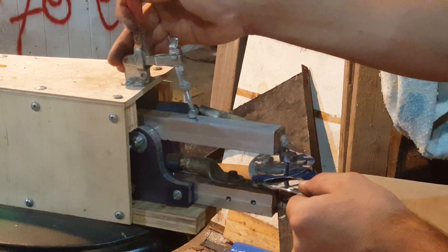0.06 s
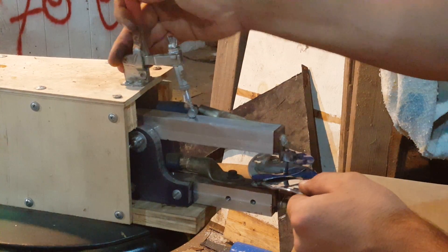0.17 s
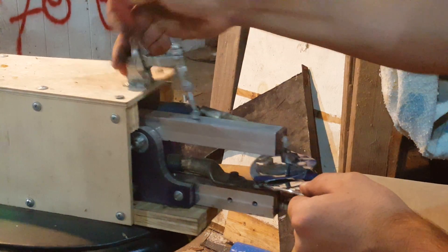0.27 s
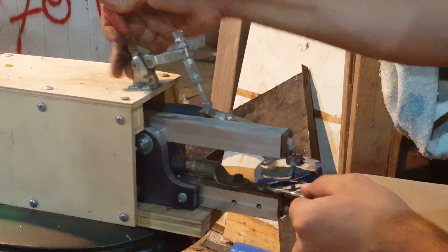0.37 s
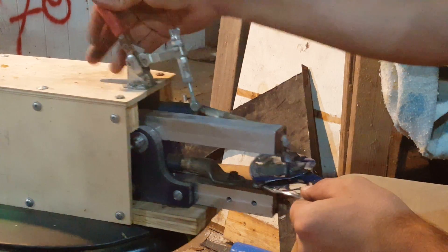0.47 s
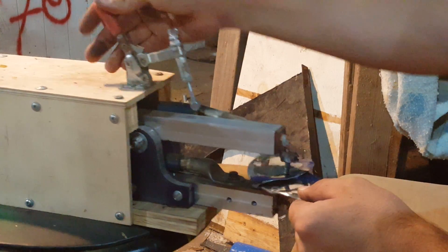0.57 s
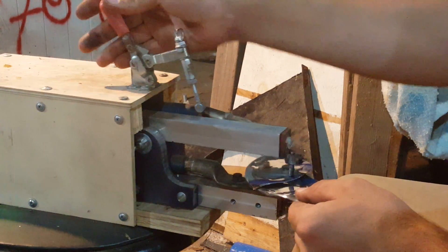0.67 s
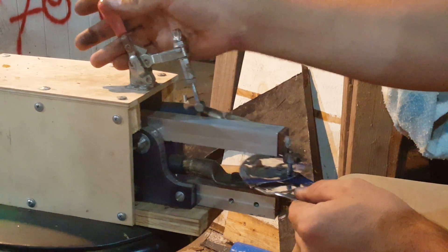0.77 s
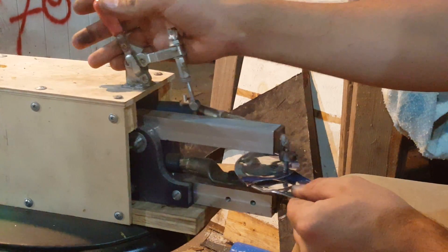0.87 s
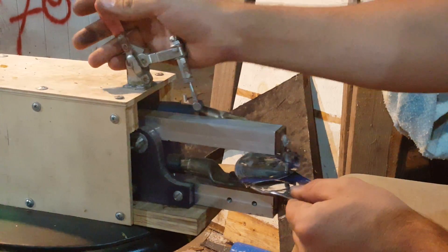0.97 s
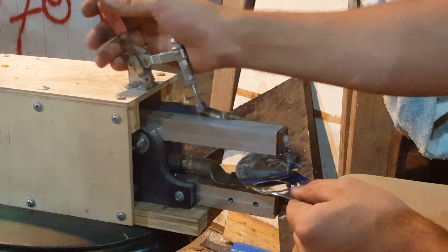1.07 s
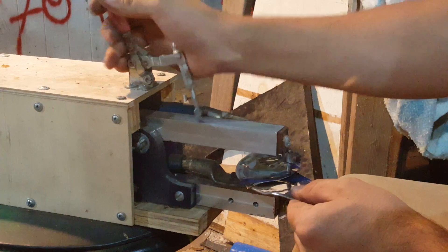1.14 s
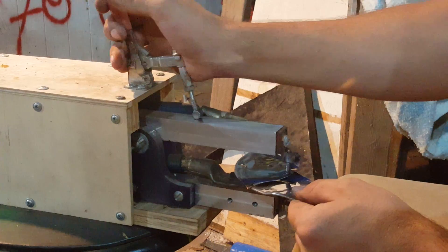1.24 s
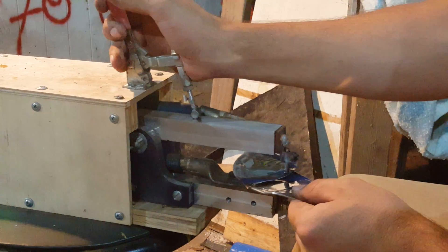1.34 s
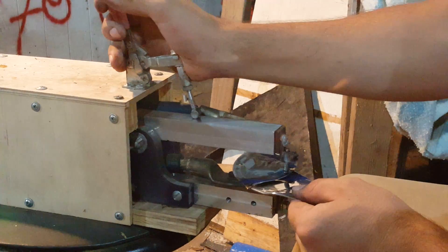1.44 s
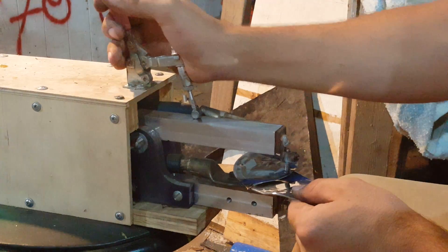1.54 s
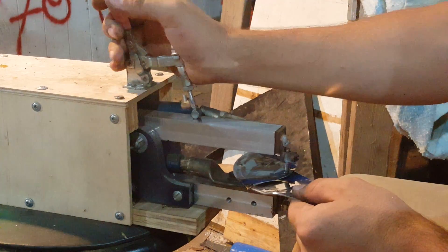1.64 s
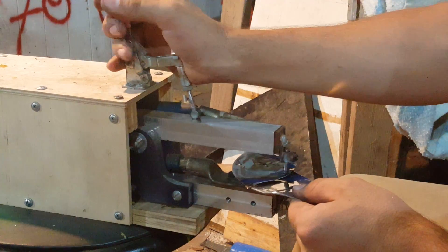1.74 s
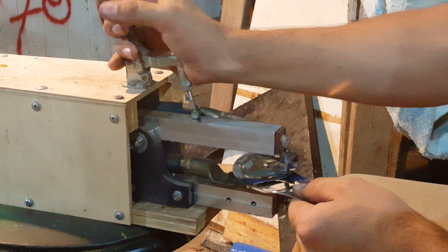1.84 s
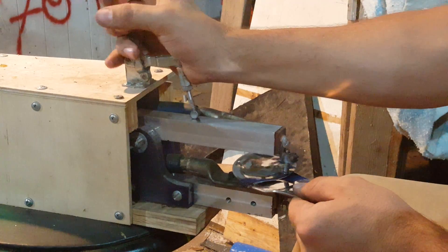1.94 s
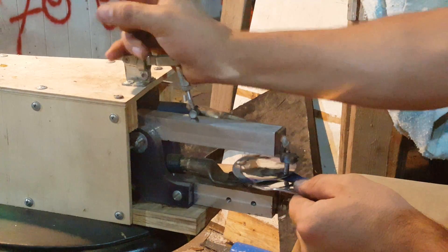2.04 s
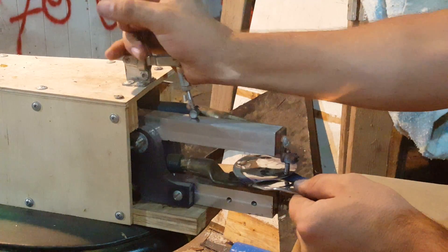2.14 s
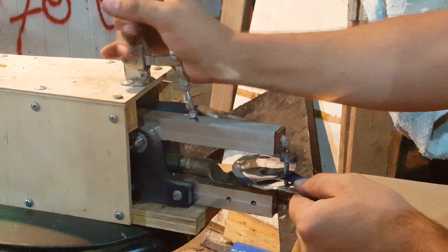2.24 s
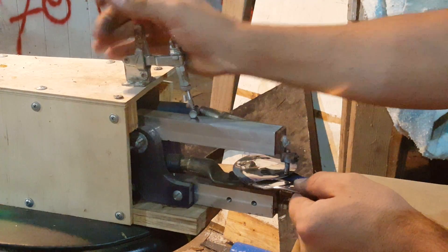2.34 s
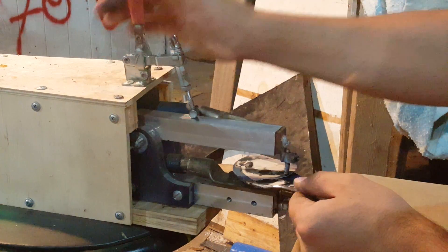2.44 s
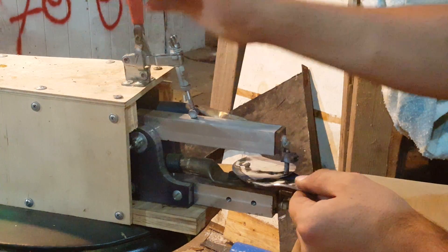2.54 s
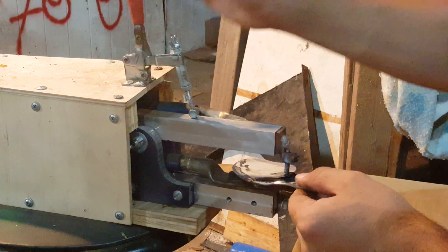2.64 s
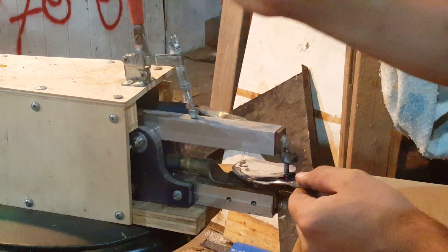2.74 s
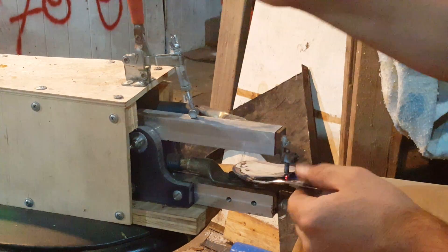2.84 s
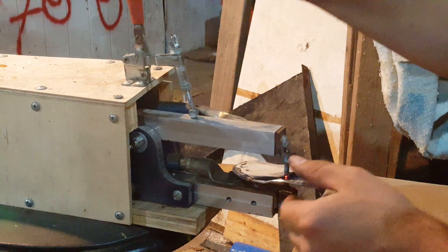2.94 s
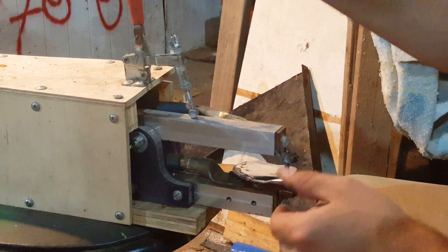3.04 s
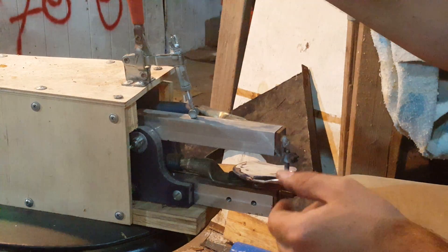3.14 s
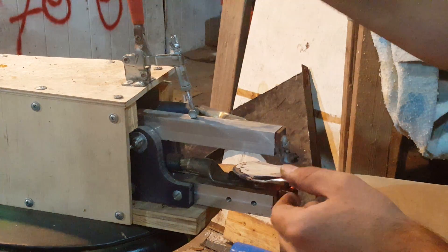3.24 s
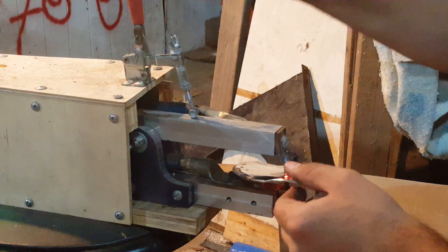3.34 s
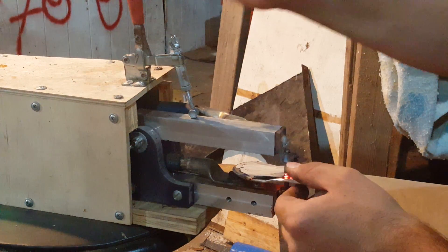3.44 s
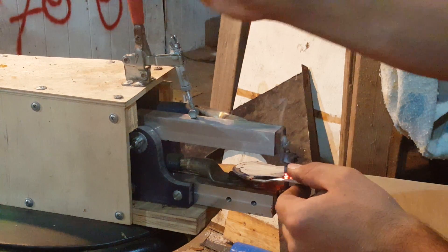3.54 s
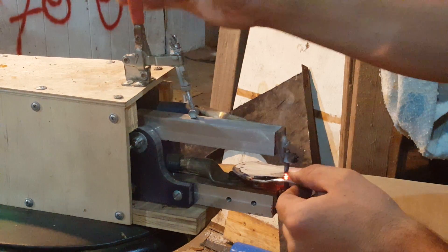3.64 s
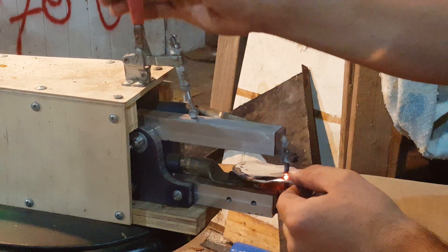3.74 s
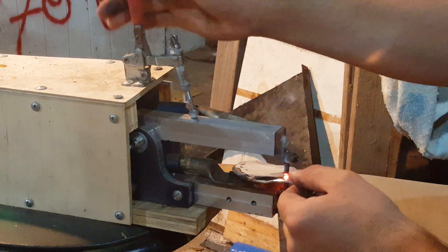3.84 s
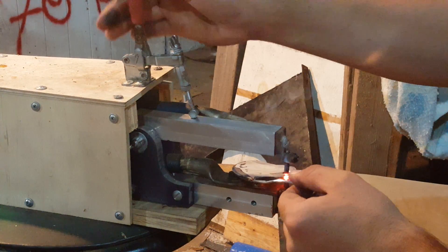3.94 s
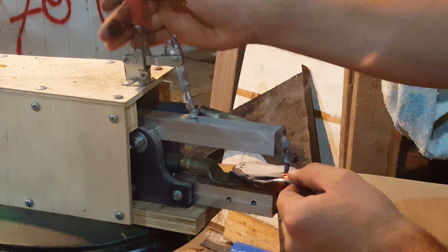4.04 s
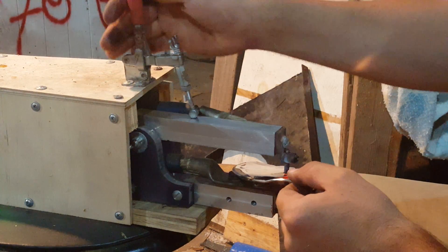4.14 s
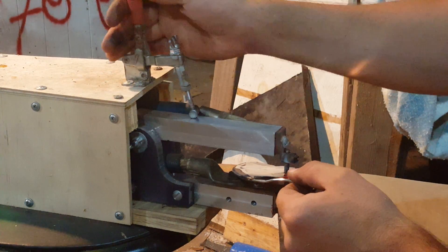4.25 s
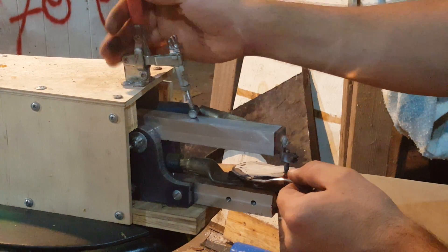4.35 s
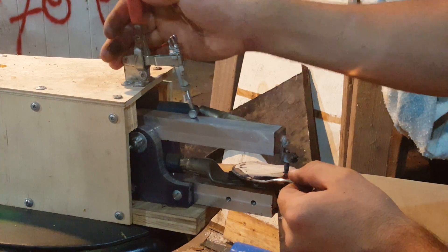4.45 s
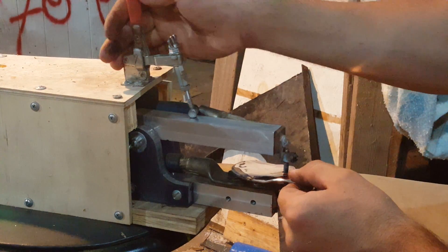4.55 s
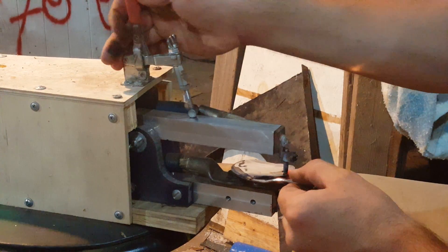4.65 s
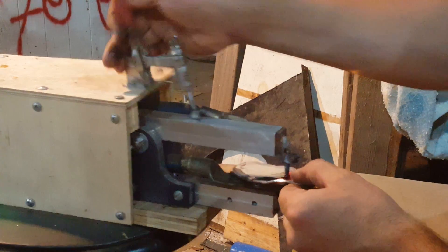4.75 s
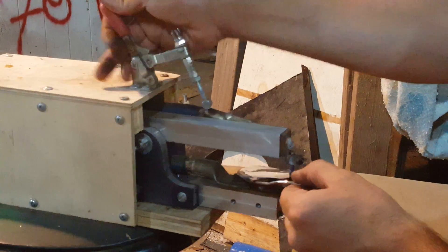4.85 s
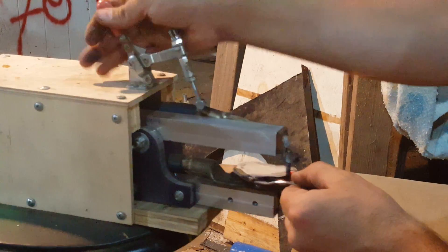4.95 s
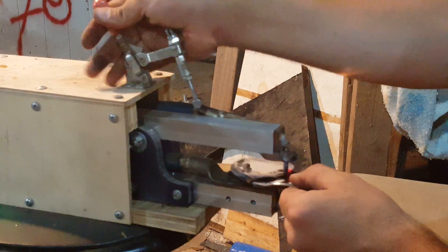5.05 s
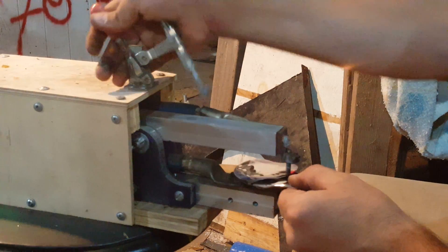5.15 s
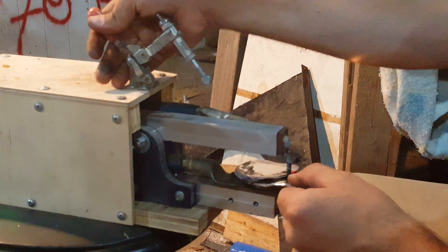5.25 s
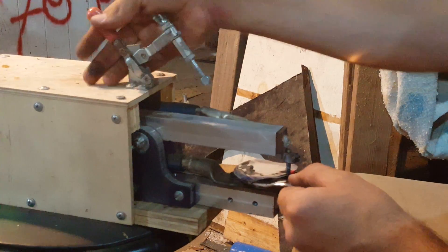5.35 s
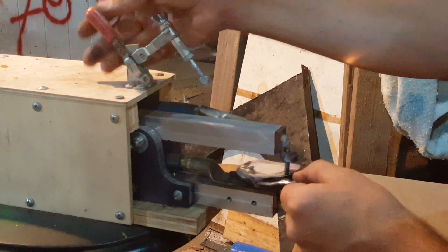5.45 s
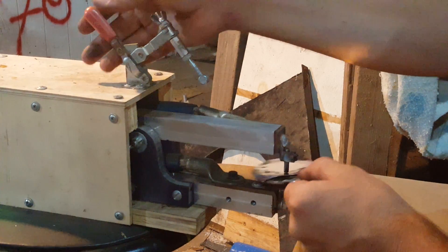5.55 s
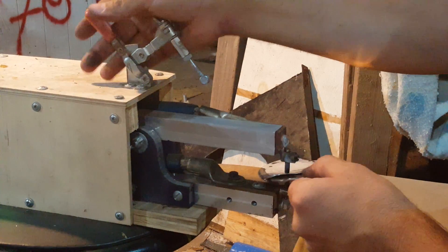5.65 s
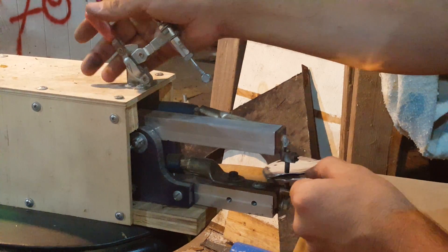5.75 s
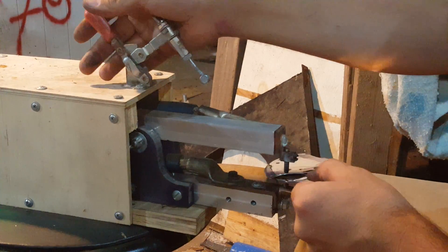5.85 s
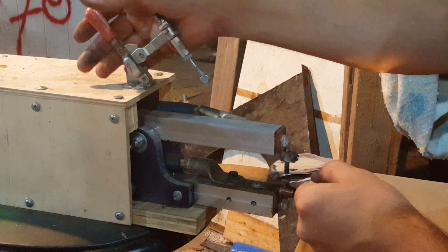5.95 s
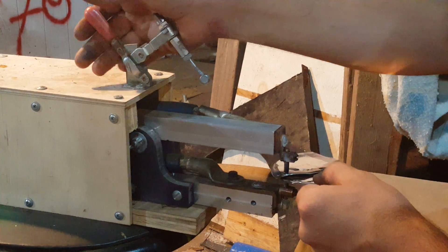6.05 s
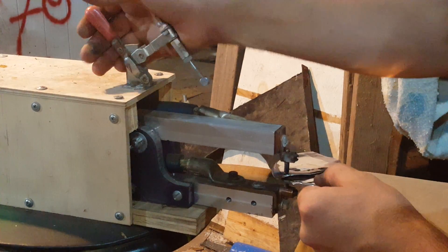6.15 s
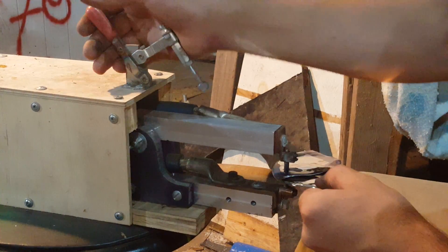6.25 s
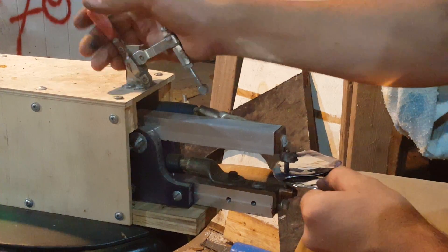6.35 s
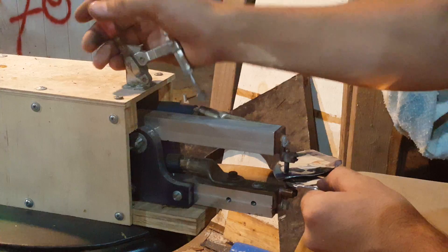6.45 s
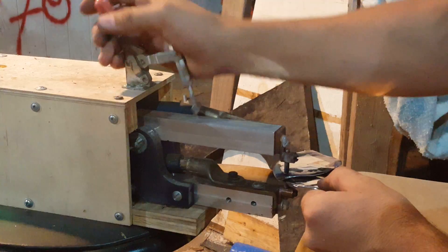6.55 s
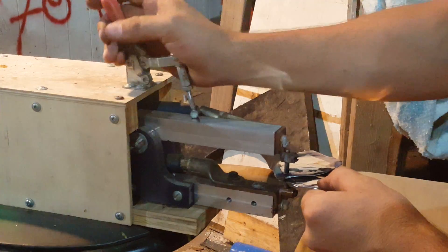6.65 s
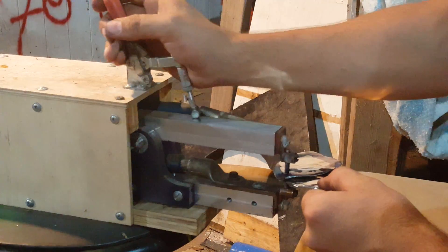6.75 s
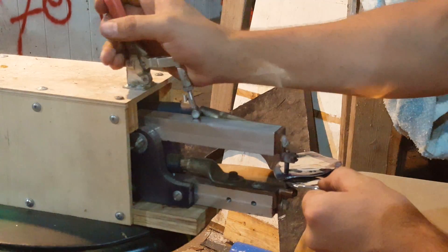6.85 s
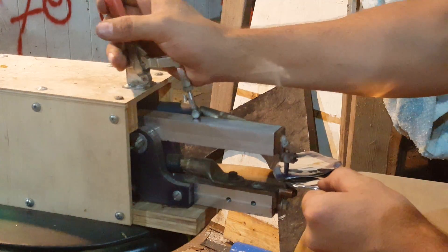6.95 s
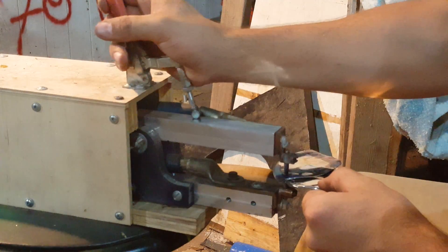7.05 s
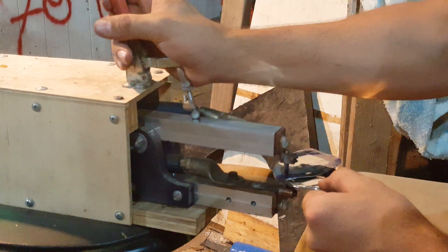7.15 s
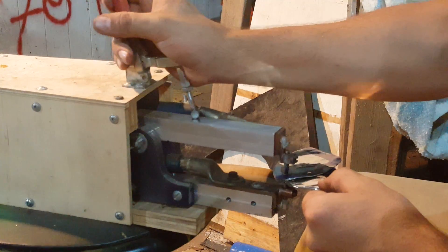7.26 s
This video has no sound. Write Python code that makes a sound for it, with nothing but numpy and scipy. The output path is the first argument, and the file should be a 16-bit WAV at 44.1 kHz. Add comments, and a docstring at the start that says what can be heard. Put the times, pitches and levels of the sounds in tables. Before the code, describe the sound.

A metal toggle clamp on a hollow plywood box clacks and rattles at uneven intervals, with sheet-metal scrapes over faint workshop hum.

```python
"""Toggle clamp on a plywood welder box, snapped shut and opened by hand, close to a two-port microphone.
Each blow rings wood modes; a snap and loose chatter drive the modes of the electrode arm and steel links.
Sheet metal slides between the tips (filtered random slips); dry pivots squeak (wavering tones, rub noise);
the bench thumps under the box. Near sounds echo in a small workshop (noise tail).
Behind: fan and transformer hum (sines), fan air and hiss (shaped noise)."""
import sys
import numpy as np
from scipy import signal
from scipy.fft import rfft, irfft, next_fast_len
from scipy.io import wavfile
from scipy.ndimage import uniform_filter1d

SR = 44100
rng = np.random.default_rng(int(sys.argv[2]) if len(sys.argv) > 2 else 0)


def inscribe(sig):
    """Save sig as 16-bit PCM at rate SR to the path in sys.argv[1].

    A 1-D sig is mono; a 2-D sig holds one channel per row.
    Samples are clipped to [-1, 1] before scaling.
    """
    pcm = np.round(np.clip(np.atleast_2d(sig).T, -1, 1) * 32767)
    wavfile.write(sys.argv[1], SR, pcm.astype(np.int16))


N = 322371

# Fan blade tones: multiple_of_blade_rate, mean_level_db
FAN_TONES = [(1, -70), (2, -71), (3, -71), (4, -70), (5, -67), (6, -74)]
# Transformer lines: pitch_hz, level_db (before MAINS_SWELL)
MAINS_LINES = [(240, -69), (360, -68), (480, -81), (600, -81.5), (720, -79)]
# Slow gain of the transformer lines: time_s, gain_db
MAINS_SWELL = [(0, -3), (2.4, 2.5), (2.7, 6), (3.9, 3.5), (4.2, -5), (7.31, 4)]
# Fan air spectrum shape: frequency_hz, relative_density_db
AIR_SHAPE = [(18, -71), (30, -29), (75, -9.5), (141, -8.5), (245, -7.5), (311, -12.5), (345, -0.5),
             (384, -15.5), (426, -2.5), (540, -12.5), (2290, -18.5), (4650, -33.5), (6210, -39),
             (7470, -54), (16000, -35.5)]
# Hiss bands: centre_hz, width_hz, level_db (before flicker)
HISS_BANDS = [(6286, 630, -70.5), (8650, 710, -78), (11400, 4600, -86)]
# Left-right likeness of noise: frequency_hz, likeness (negative read as 0)
LIKENESS_CURVE = [(60, 0.82), (130, 0.99), (290, 0.67), (640, 0.5), (1410, -0.13), (3100, 0.31), (6820, 0),
                  (15000, 0)]
# Workshop echo: frequency_hz, t60_s, level_db
ROOM_DECAY = [(150, 0.92, -7), (404, 0.82, -10), (990, 0.46, -6), (2480, 0.69, -10), (5070, 0.47, -10.5),
              (10000, 1, -19), (15000, 0.15, -9)]
# Port colouring: frequency_hz, left_minus_right_db
PORT_TILT = [(60, 3), (110, -1), (200, -0.5), (380, -0.5), (700, 3), (1290, 0.5), (2380, 5.5), (4400, -3),
             (8120, -7.5), (15000, 0.5)]
# Pivot squeaks: middle_s, half_length_s, tone_db, pitch_hz, rub_db
PIVOT_SWINGS = [(5.536, 0.032, -67, 4350, -63.5), (5.6, 0.039, -68, 4400, -61.5),
                (5.668, .03, -70, 4380, -66), (6.055, 0.038, -66.5, 4650, -68.5)]
# Sheet slides: start_s, level_db, fade_db_per_s
SHEET_SLIDES = [(6.527, -42, 72), (6.82, -53, 69), (6.962, -45, 81), (7.192, -45.5, 79)]
# Sheet resonances: centre_hz, width_hz, relative_db
SHEET_BANDS = [(1260, 1300, 19.5), (1954, 770, 22), (2690, 2200, -36), (4300, 2500, -12)]
# Bench thumps: start_s, peak_db, nominal_pitch_hz
BENCH_THUMPS = [(0.503, -48, 147), (0.659, -56, 156.6)]
# Modes of box, lid, arm, links: nominal_pitch_hz, relative_db, t60_s
BOX_MODES = [(299, -9.5, 0.047), (349, 1.5, 0.04), (387, 1, 0.067), (448, -8.5, 0.075)]
LID_MODES = [(532, 4, 0.047), (684, 4, 0.032), (752.4, -3.5, 0.046), (880, 3, 0.026), (1037, 1.5, 0.028),
             (1236, -2.5, 0.039), (1350, 4, 0.02), (1820, 8, 0.022)]
ARM_MODES = [(1600, -1, 0.014), (1993, -8.5, 0.014), (2203, -5, 0.025), (2594, -2, 0.01),
             (2700, -10.5, 0.027)]
LINK_MODES = [(3195, 1.5, 0.014), (3700, -11, 0.0022), (4040, 1.5, 0.0059), (4465, -3.5, 0.025),
              (4780, 1.5, 0.0053), (5200, -4, 0.0026)]
# Clamp blows: start_s, box_db, lid_db, lid_spot_hz, link_db, crack_db, chatter_gain_db
CLAMP_BLOWS = [(0.334, -39, -45, 870, -47, -45.5, -3), (0.367, -22.5, -37, 650.0, -52, -60, -5),
               (0.3733, -23, -26, 683, -23.5, -24.5, -2.5), (0.499, -42.5, -41.5, 850, -44.5, -51, 2),
               (0.6584, -54.5, -43.5, 850, -36, -33, -10), (0.8285, -59, -52, 704, -48.5, -51, 6),
               (1.1433, -37, -37.5, 750, -93, -71, -2), (1.1834, -29.5, -28, 810, -82, -68.5, -1),
               (1.2444, -29.5, -25.5, 690, -25, -53, -29.5), (1.897, -42, -43, 730.0, -81, -43.5, -12),
               (2.121, -13.5, -13.5, 970, -12, -24, -18.5), (2.5353, -51, -28, 1340, -53, -59, 10),
               (2.5625, -59, -37.5, 860, -51, -48.5, 6), (2.6098, -45, -41.5, 890.0, -42, -37.5, -7),
               (2.635, -54, -40.5, 825.0, -49, -62, -7), (2.7158, -42, -36.5, 720.0, -40, -41.5, -22),
               (2.723, -58, -49, 806, -37, -44, 5.0), (2.756, -47, -46, 770, -41, -51, -11),
               (3.573, -57, -67.5, 850.0, -49.5, -48, -0.5), (3.955, -62.0, -76, 600.0, -48, -49, -20),
               (4.069, -66, -47.5, 930, -39.5, -37, -10), (4.114, -65, -45.5, 840, -86, -66.0, -15.0),
               (4.1471, -61.0, -43, 1270, -91, -71.0, -12), (4.2054, -52, -47, 1190.0, -88, -68.5, 1),
               (4.242, -68, -58, 990, -36, -38, -8), (4.2663, -67, -44.5, 1190, -70, -67, 1),
               (4.3303, -67, -43, 1270, -66.0, -71.0, 3), (4.3612, -60.5, -40.5, 1440, -33, -36, -19),
               (4.8229, -44, -42, 700, -42, -40, -1), (4.846, -18.5, -23.5, 673, -46, -46.0, -1.0),
               (4.868, -42.5, -33.5, 770, -26.5, -31.5, -1), (4.892, -41, -47, 620.0, -30.5, -32.5, 10),
               (4.904, -36, -50.5, 676.0, -37, -40, 4), (4.97, -43, -37.5, 683, -59, -53, 2),
               (5.296, -49, -38, 710, -63, -63.0, 5), (5.902, -52.0, -49, 785, -95, -66, -12),
               (6.6866, -27.5, -26, 670, -38, -36.5, -28), (7.1805, -41.5, -43.5, 750, -64, -42, -15)]

FAN_BLADE_HZ = 85.24
AIR_DB, AIR_SWELL_DB, AIR_FLICKER_DB = -58, 0.7, 0.9
LOWER_PITCH_RATIO, LOWER_DB = 0.75, -3  # lower partial of the squeak, against the upper
SLIDE_ATTACK_S = 0.011
SPOT_DB, DETUNE_RATIO = 2, 0.012  # random spread per mode: each blow lands elsewhere
SPOT_OCTAVES = 0.34  # lid modes this far from the struck spot's pitch are 6 dB down
SNAP_T60_S, CHATTER_T60_S, GRAIN_DB = 0.006, 0.17, 2.5
# Arm sits between wood and links: its level takes a share of each, less when the steel is loose
ARM_DB, ARM_PER_LID, ARM_PER_LINK, ARM_PER_CHATTER = -10, 0.34, 0.33, -0.49
CLATTER_DB = 4  # unpitched part of arm and links against their modes
PORT_LAG_S, TOP_HZ = 0.0003, 15800


def undb(db):
    """Decibels to gain."""
    return 10 ** (np.asarray(db) / 20)


def level(x, db):
    """Scale to an rms level."""
    return x * undb(db) / np.sqrt(np.mean(x ** 2))


def peak(y):
    """Scale to peak 1."""
    return y / np.abs(y).max()


def decay(t, t60_s):
    """Exponential fade, 60 dB down at t60_s."""
    return np.exp(-np.log(1000) * t / t60_s)


def on_log(hz, table, column=1):
    """Interpolate a table along log frequency."""
    table = np.array(table, float)
    return np.interp(np.log(np.maximum(hz, 1)), np.log(table[:, 0]), table[:, column])


def band(x, hz, width_hz):
    """Resonance with gain 1 at the centre."""
    return signal.lfilter(*signal.iirpeak(hz, hz / width_hz, fs=SR), x)


def band_twice(x, hz, width_hz):
    """Two equal resonances in series, for steeper skirts."""
    return band(band(x, hz, width_hz), hz, width_hz)


def walk(rate_hz):
    """Random levels held 1 / rate_hz seconds and slewed twice."""
    k = int(SR / rate_hz)
    steps = np.repeat(rng.standard_normal(N // k + 1), k)
    return 1.27 * uniform_filter1d(uniform_filter1d(steps, k), k)[:N]


def pair(size):
    """Spectra of left and right noise, alike in the bass and unrelated in the treble."""
    alike = np.clip(on_log(np.fft.rfftfreq(size, 1 / SR), LIKENESS_CURVE), 0, 1)
    mid, side = rfft(rng.standard_normal((2, size)))
    sign = np.array([[1], [-1]])
    return mid * np.sqrt(1 + alike) + sign * side * np.sqrt(1 - alike)


def ring(modes, t, rise_s, spot_hz=None):
    """One blow on decaying modes; those near the spot's pitch speak most, high ones differ in port phase."""
    hz, db, t60_s = np.transpose(modes)[:, :, None]
    chance = rng.standard_normal((3, len(modes), 1))
    if spot_hz:
        db = db - 6 * (np.log2(hz / spot_hz) / SPOT_OCTAVES) ** 2
    phase = 2 * np.pi * hz * (1 + DETUNE_RATIO * chance[0]) * t
    skew = np.array([1, -1])[:, None, None] * chance[2] * np.minimum(hz / 3000, 0.5)
    gain = undb(db + SPOT_DB * chance[1])
    y = np.sum(gain * decay(t, t60_s) * np.sin(phase + skew), axis=1)
    return peak(y * (1 - np.exp(-t / rise_s)))


def hum():
    """Blade tones waver in level and phase; the mains lines swell and sink."""
    t = np.arange(N) / SR
    fan, mains = 0, 0
    for multiple, db in FAN_TONES:
        gain = undb(db + 1.3 * walk(4.3))
        fan = fan + gain * np.sin(2 * np.pi * multiple * FAN_BLADE_HZ * t + 1.64 * walk(7))
    for hz, db in MAINS_LINES:
        gain = undb(db + 0.37 * walk(4.6))
        mains = mains + gain * np.sin(2 * np.pi * (hz * t + rng.random()))
    swell = undb(np.interp(t, *np.transpose(MAINS_SWELL)))
    return np.sqrt(2) * (fan + mains * swell)  # sine amplitude from rms


def air():
    """Fan air noise in four ranges that flicker apart, plus flickering hiss bands."""
    hz = np.fft.rfftfreq(N, 1 / SR)
    noise, out = pair(N) * undb(on_log(hz, AIR_SHAPE)), 0
    for low_hz, high_hz in [(0, 200), (200, 700), (700, 3000), (3000, SR)]:
        part = irfft(noise * ((hz >= low_hz) & (hz < high_hz)), N)
        out = out + part * undb(AIR_SWELL_DB * walk(2.25) + AIR_FLICKER_DB * walk(12))
    source, hiss = rng.standard_normal((2, N)), 0
    for centre_hz, width_hz, db in HISS_BANDS:
        hiss = hiss + level(band_twice(source, centre_hz, width_hz), db) * undb(walk(11))
    return level(out, AIR_DB) + hiss


def workshop(x, gap_s=0.0058):
    """Echo: a noise tail in half-octave steps, each fading at its own rate."""
    size = int(0.7 * SR)
    t, hz = np.arange(size) / SR, np.fft.rfftfreq(size, 1 / SR)
    noise, tail = pair(size), 0
    for centre_hz in 90 * 2 ** np.arange(0, 7.6, 0.5):
        octaves_off = np.abs(np.log2(np.maximum(hz, 1) / centre_hz))
        part = irfft(noise * np.clip(1 - 2 * octaves_off, 0, 1), size)
        t60_s = on_log(centre_hz, ROOM_DECAY)
        # divide out the energy of the fade
        part = part * decay(t, t60_s) / np.sqrt(t60_s * SR / np.log(1000) / 2)
        tail = tail + undb(on_log(centre_hz, ROOM_DECAY, column=2)) * part
    tail = tail * np.clip(t / gap_s, 0, 1) ** 2  # gradual onset
    return signal.fftconvolve(x.mean(axis=0)[None], tail, axes=1)[:, :N]


def squeaks():
    """Dry pivots hiss widely and sing two rough, wavering tones; each swing swells and fades."""
    t = np.arange(N) / SR
    waver_s = np.cumsum(0.0061 * walk(60)) / SR
    rough_upper, rough_lower = walk(200), walk(200)
    rub = level(band(rng.standard_normal((2, N)), 1800, 3500), 0) * undb(2 * walk(60))
    out = 0
    for middle_s, half_s, tone_db, hz, rub_db in PIVOT_SWINGS:
        phase = 2 * np.pi * hz * (t + waver_s) + np.array([[0], [1.5]])  # ports differ in phase
        upper = rough_upper * np.sin(phase)
        lower = undb(LOWER_DB) * rough_lower * np.sin(LOWER_PITCH_RATIO * phase)
        swing = np.exp(-((t - middle_s) / half_s) ** 2)
        out = out + swing * ((upper + lower) * undb(tone_db) + rub * undb(rub_db))
    return out


def slides():
    """Dense uneven slips excite the sheet; each slide starts fast and dies away."""
    t = np.arange(N) / SR
    slips = rng.standard_normal((2, N)) * undb(2.9 * np.minimum(rng.exponential(size=N), 5))
    sheet, power = 0, 0
    for hz, width_hz, db in SHEET_BANDS:
        sheet = sheet + undb(db) * band_twice(slips, hz, width_hz)
    for start_s, db, fade_db_per_s in SHEET_SLIDES:
        attack = np.clip((t - start_s) / SLIDE_ATTACK_S, 0, 1)
        faded_db = db - fade_db_per_s * np.maximum(t - start_s, 0)
        power = power + attack ** 2 * undb(2 * faded_db)
    return level(sheet, 0) * np.sqrt(power)


def thumps():
    """The bench under the box rings briefly on one low mode."""
    t = np.arange(int(0.2 * SR)) / SR
    out = np.zeros((2, N))
    for start_s, db, hz in BENCH_THUMPS:
        i = int(start_s * SR)
        out[:, i:i + len(t)] += undb(db) * ring([(hz, 0, 0.15)], t, 0.0033)
    return out


def contact(t, chatter_db):
    """Steel-on-steel force: a short noise snap plus a longer chatter of loose parts."""
    shared, left, right = rng.standard_normal((3, len(t)))
    snap = shared * decay(t, SNAP_T60_S)
    snap[4] += 6  # hardest contact: one sharp step
    loose = (shared + 0.97 * np.array([left, right])) * decay(t, CHATTER_T60_S)
    # many tiny uneven knocks, 40 samples each
    strength = np.repeat(rng.exponential(size=len(t) // 40 + 1), 40)[:len(t)]
    knocks = undb(GRAIN_DB * (strength - 2.5))
    return snap + undb(chatter_db) * loose * knocks


def steel_part(modes, steel, t, clatter_hz, clatter_width_hz):
    """Modes driven by the contact force, plus its broad unpitched clatter."""
    rung = peak(signal.fftconvolve(ring(modes, t, 0.00014), steel, axes=1)[:, :len(t)])
    clatter = peak(band_twice(steel, clatter_hz, clatter_width_hz))
    return peak(rung + undb(CLATTER_DB) * clatter)


def crack_of(steel):
    """Treble of the contact force, stressed by two resonances."""
    crack = signal.sosfilt(signal.butter(2, 5500, "high", fs=SR, output="sos"), steel)
    crack = crack + 3.1 * band(crack, 13040, 3800)
    return peak(crack + 7 * band(crack, 8070, 840))


def clamp():
    """Every blow rings the wood once; a snap and the chatter of loose steel excite arm and links."""
    t = np.arange(int(0.2 * SR)) / SR
    lag, out = int(PORT_LAG_S * SR), np.zeros((2, N + len(t)))
    for start_s, box_db, lid_db, lid_hz, link_db, crack_db, chatter_db in CLAMP_BLOWS:
        arm_db = ARM_DB + ARM_PER_LID * lid_db + ARM_PER_LINK * link_db + ARM_PER_CHATTER * chatter_db
        steel = contact(t, chatter_db)
        arm = steel_part(ARM_MODES, steel, t, 1800, 1640)
        links = steel_part(LINK_MODES, steel, t, 3350, 2700)
        metal = undb(arm_db) * arm + undb(link_db) * links + undb(crack_db) * crack_of(steel)
        metal[1] = np.roll(metal[1], lag)  # right port hears the steel later
        # slower rise in the wood, slowest in the box
        box = undb(box_db) * ring(BOX_MODES, t, 0.0035)
        lid = undb(lid_db) * ring(LID_MODES, t, 0.0023, lid_hz)
        i = int(start_s * SR)
        out[:, i:i + len(t)] += box + lid + metal
    out = signal.sosfilt(signal.butter(3, 170, "high", fs=SR, output="sos"), out)
    return out[:, :N]


def scene():
    """Near sounds with their echo over the workshop hum and air."""
    near = clamp() + thumps() + slides() + squeaks()
    return near + workshop(near) + hum() + air()


def record(dry):
    """The two ports colour the sound differently; the top is cut."""
    size = next_fast_len(N)
    half_tilt_db = on_log(np.fft.rfftfreq(size, 1 / SR), PORT_TILT) / 2
    x = irfft(rfft(dry, size) * undb([half_tilt_db, -half_tilt_db]), size)[:, :N]
    return signal.sosfilt(signal.ellip(10, 0.2, 70, TOP_HZ, fs=SR, output="sos"), x)


dry = scene()
out = record(dry)
inscribe(out)
```